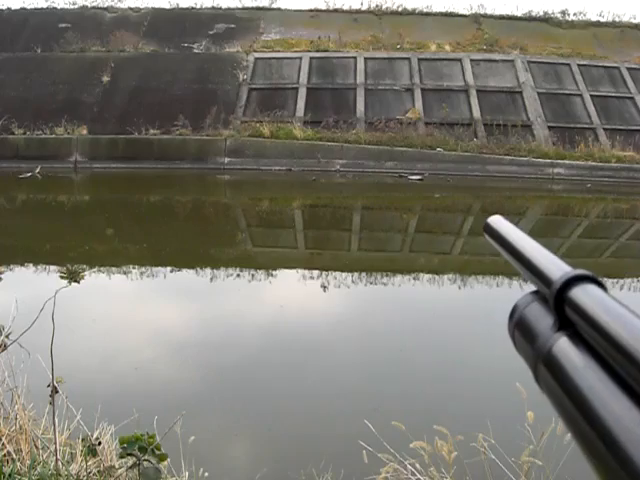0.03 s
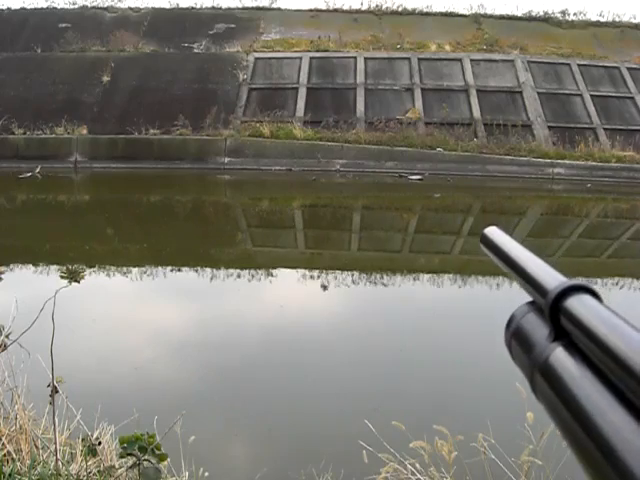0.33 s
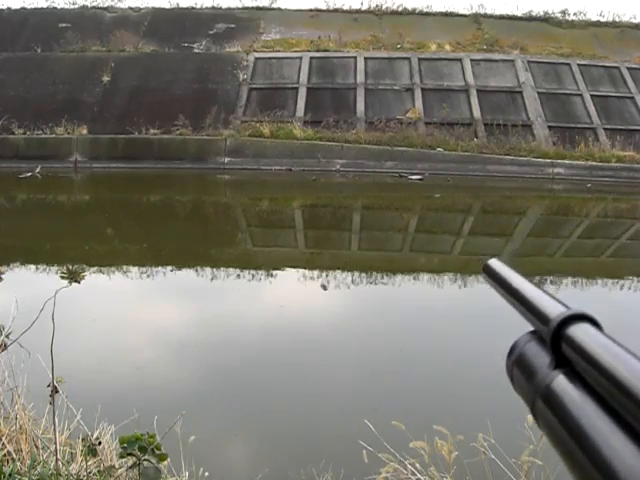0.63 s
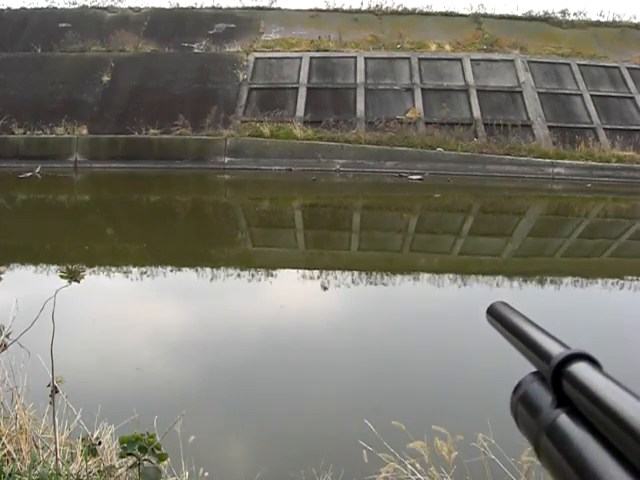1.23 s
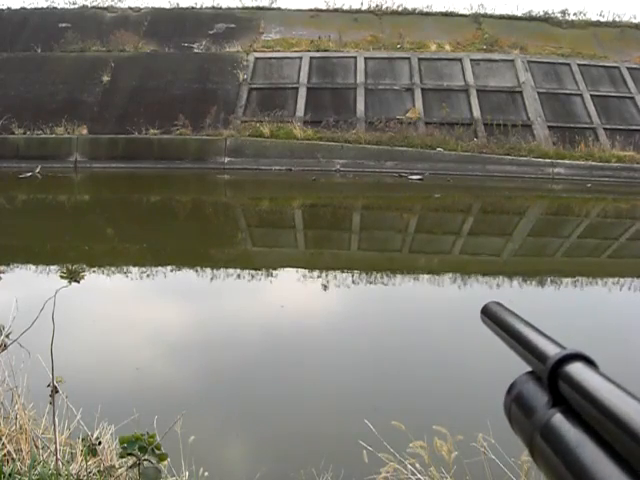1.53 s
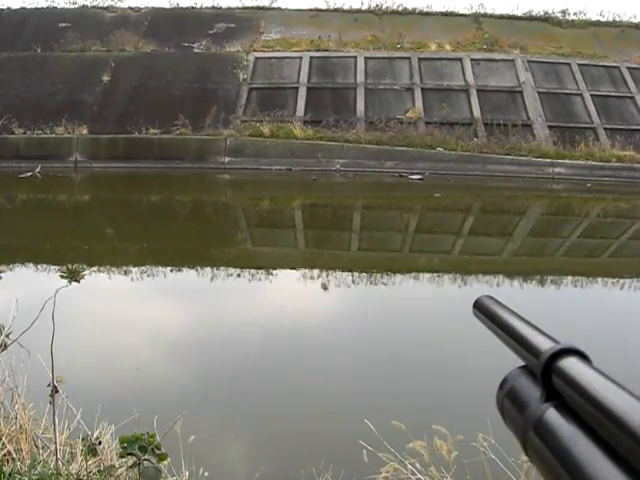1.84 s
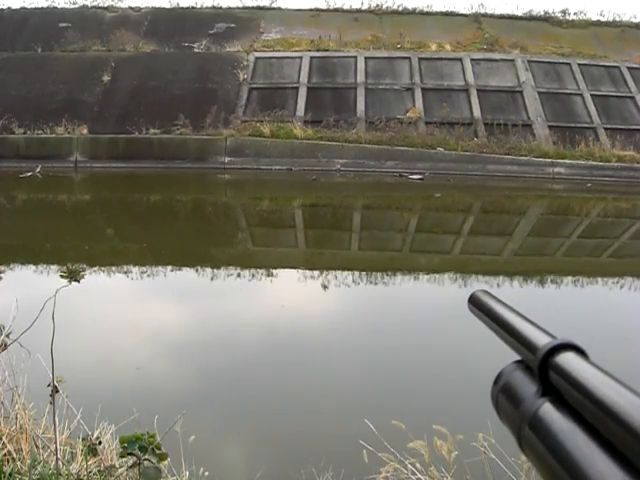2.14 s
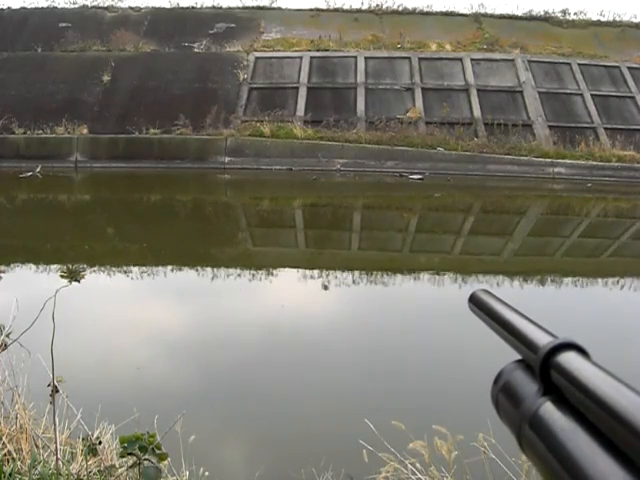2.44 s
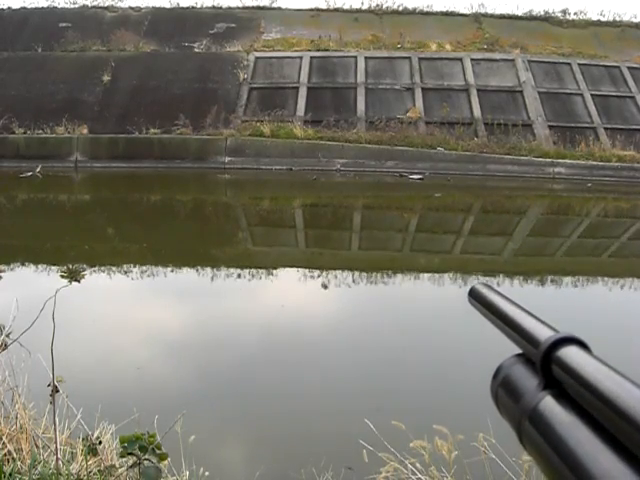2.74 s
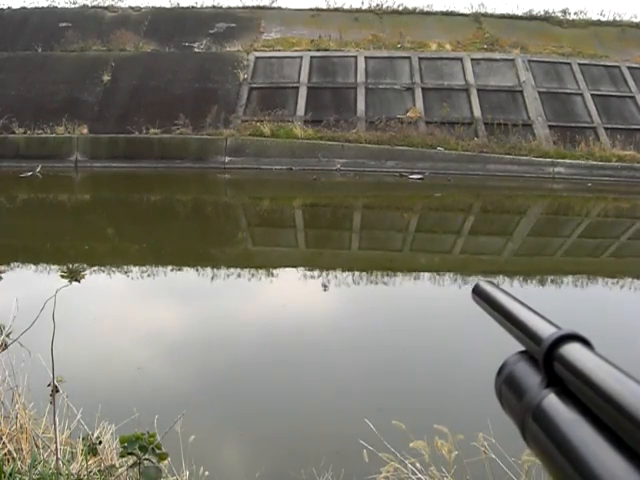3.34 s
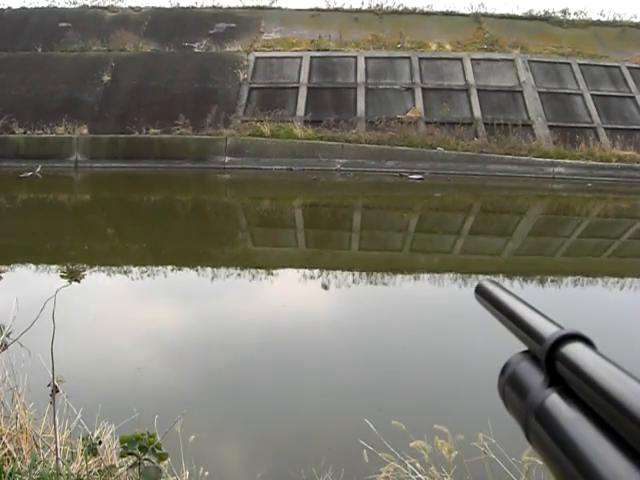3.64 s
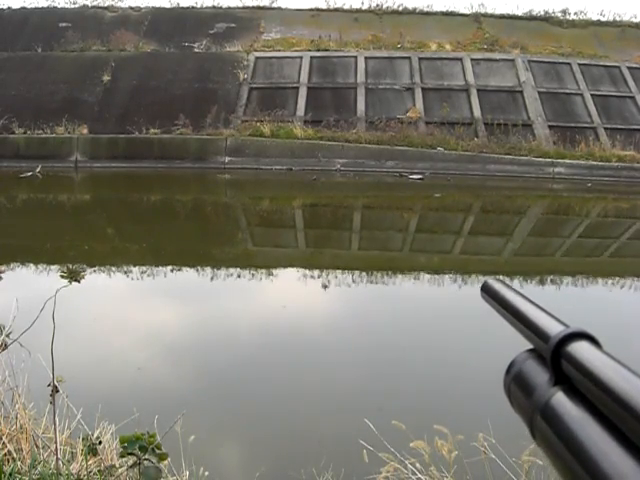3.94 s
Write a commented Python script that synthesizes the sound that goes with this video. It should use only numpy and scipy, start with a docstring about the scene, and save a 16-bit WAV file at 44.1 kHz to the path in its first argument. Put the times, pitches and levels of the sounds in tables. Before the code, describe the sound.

An air rifle is handled close to the microphone, rubbing, ticking and creaking, while a small bird gives four pairs of high chirps. A firmer knock and thin ticks follow, over outdoor hiss, wind rumble and a distant engine-like hum.

```python
"""Open-air hiss, wind rumble on the microphone and a hum like a distant engine's run throughout.
From 0.5 s a small bird beside a pond gives four pairs of high, arched chirps; far birds peep faintly.
Meanwhile, close by, a hand shifts on an air rifle: it rubs, ticks and is knocked softly,
and creaks ring its body, thickest from 2 to 2.7 s. After the last chirps comes the firmest knock,
at 3.2 s; the hum swells, and a run of thin ticks ends the scene."""
import sys
import numpy as np
from scipy import signal
from scipy.fft import rfft, irfft
from scipy.io import wavfile
from scipy.ndimage import uniform_filter1d

SR = 44100
rng = np.random.default_rng(int(sys.argv[2]) if len(sys.argv) > 2 else 0)


def store_wav(level_fs):
    """Save 16-bit WAV to argv[1]."""
    pcm = np.round(np.clip(np.atleast_2d(level_fs), -1, 1) * 32767)
    wavfile.write(sys.argv[1], SR, pcm.T.astype(np.int16))


N = 176400
T = np.arange(N) / SR

# rifle body modes: f/Hz, level/dB, t60/s
BODY_MODES = [(318, -13.5, 0.11), (390, -29, 0.02), (501, -12, 0.087), (561, -18, 0.16), (622, -6, 0.045),
              (772, -10, 0.084), (1234, -22, .08), (1345, -16, 0.069), (1510, -24.5, 0.065),
              (2133, -12, 0.028), (2310, -28.5, 0.037), (2500, -48, 0.077), (2760, -33.5, 0.045)]


def amp(db):
    """Decibels to gain."""
    return 10 ** (np.asarray(db) / 20)


def unit(x):
    """Scale to rms 1."""
    return x / np.sqrt(np.mean(x ** 2) + 1e-20)


def spectrum_db(colour, hz):
    """Interpolate a spectrum over log frequency."""
    f, db = np.transpose(colour)
    return np.interp(np.log(hz + 1), np.log(f), db)


def add(mix, start_s, sound):
    """Mix a sound in at start_s."""
    part = mix[max(round(start_s * SR), 0):][:len(sound)]
    part += sound[:len(part)]


def drift(rate_hz):
    """Low-passed noise, rms 1."""
    lowpass = np.exp(-(np.fft.rfftfreq(N, 1 / SR) / rate_hz) ** 2)
    return unit(irfft(rfft(rng.standard_normal(N)) * lowpass, N))


def impulse(colour, tilt_db_oct=0, size=2048):
    """Minimum-phase pulse, energy 1, tilted above 500 Hz."""
    hz = abs(np.fft.fftfreq(size, 1 / SR))
    log_gain = np.log(amp(spectrum_db(colour, hz) + tilt_db_oct * np.log2(1 + hz / 500)))
    h = np.fft.ifft(np.exp(np.conj(signal.hilbert(log_gain)))).real[:size // 2]
    return h / np.linalg.norm(h)


def scatter(decay_s):
    """Spray of small reflections: decaying noise, energy 1."""
    t = T[:SR // 5]
    h = rng.standard_normal(len(t)) * np.exp(-t / decay_s)
    return h / np.linalg.norm(h)


def ring(modes, spread_db=2):
    """Decaying modes of alternating sign, reweighted at each blow."""
    t = T[:SR // 5]
    return sum((-1) ** k * amp(db + spread_db * rng.standard_normal() - 60 * t / t60_s)
               * np.sin(2 * np.pi * hz * t) for k, (hz, db, t60_s) in enumerate(modes))


def crack(colour, tilt_db_oct, rattle):
    """Sharp snap with a quick rattle and a faint tail."""
    spray = rattle * (scatter(decay_s=.0014) + amp(-10) * scatter(decay_s=.008))
    spray[0] += 1
    h = signal.fftconvolve(spray, impulse(colour, tilt_db_oct))
    return 2.78 * h / np.linalg.norm(h)


def air():
    """Open-air hiss with drifting spectral patches."""
    # hiss spectrum: f/Hz, relative density/dB
    colour = [(82, -33.5), (140, -2.5), (151, -9.5), (376, -8), (420, -10), (461, -10.5), (621, -16),
              (837, -15.5), (1330, -19), (2460, -23.5), (3510, -24.5), (3850, -25.5), (6490, -31),
              (9960, -34.5), (12000, -51), (15600, -80), (22000, -120)]
    # hiss envelope: t/s, level/dB
    levels = [(0, -49.5), (.3, -51.5), (.5, -49), (.8, -48.5), (1.25, -47.5), (1.55, -50), (2.1, -50),
              (2.6, -49), (3.0, -50.5), (3.35, -50.5), (3.6, -51), (4, -49)]
    patch_db, flicker_db = 1, .59
    frames, hz = N // 256 + 5, np.fft.rfftfreq(1024, 1 / SR)
    real, imag, patches = rng.standard_normal((3, frames, 513))
    patches = unit(uniform_filter1d(uniform_filter1d(patches, size=10, axis=0), size=12, axis=1))
    spectra = (real + 1j * imag) * amp(spectrum_db(colour, hz) + patch_db * patches)
    hiss = unit(signal.istft(spectra.T, nperseg=1024, noverlap=768)[1][:N])
    return hiss * amp(np.interp(T, *np.transpose(levels)) + flicker_db * drift(38))


def wind():
    """Lumpy low rumble on the microphone."""
    # rumble spectrum ahead of the low-pass: f/Hz, relative density/dB
    colour = [(10, -11), (25, -1), (45, 2.5), (60, 4), (85, -4.5), (120, -3), (170, -16.5), (300, -26),
              (800, -55)]
    # rumble envelope: t/s, level/dB
    levels = [(0, -42.5), (.5, -47), (1.2, -45), (1.6, -45.5), (2.0, -43.5), (2.5, -44.5), (2.85, -42),
              (3.1, -44), (3.4, -45.5), (3.7, -46), (4, -45)]
    cutoff_hz, flicker_db = 900, .79
    hz = np.fft.rfftfreq(N, 1 / SR)
    gain = amp(spectrum_db(colour, hz)) / (1 + (hz / cutoff_hz) ** 2)
    rumble = unit(irfft(rfft(rng.standard_normal(N)) * gain, N))
    return rumble * amp(np.interp(T, *np.transpose(levels)) + flicker_db * drift(24))


def buffets(hz=60, length_s=.029):
    """Short, dull pushes of air on the microphone."""
    # pushes: t/s, level/dB
    pushes = [(.62, -31), (2.818, -34), (2.867, -34)]
    out, t = np.zeros(N), np.arange(0, length_s, 1 / SR)
    for start_s, db in pushes:
        add(out, start_s, amp(db) * np.hanning(len(t)) * np.sin(2 * np.pi * (hz * t + rng.random())))
    return out


def hum(ref_db=-42, waver=.14):
    """Low harmonics that waver and swell, like a distant engine."""
    # course of the hum: t/s, f/Hz, level/dB
    course = [(0, 58, -54), (.9, 61, -52), (1.3, 62, -45), (1.55, 60, -52), (1.75, 62, -45), (2.2, 60, -52),
              (2.75, 62.5, -47), (3.05, 63, -44), (3.25, 62, -35.5), (3.47, 62, -34), (3.75, 62.4, -39.5),
              (3.86, 62.5, -45), (4, 63, -42)]
    # harmonics: order, relative level/dB, share of the swell
    harmonics = [(1, -1, 1), (2, -12.5, .6), (4, -23, .6), (6, -26, .6)]
    times_s, hz, db = np.transpose(course)
    turns = np.cumsum(np.interp(T, times_s, hz)) / SR
    swell_db = np.interp(T, times_s, db) - ref_db
    out = np.zeros(N)
    for order, level_db, share in harmonics:
        rms = amp(ref_db + level_db + share * swell_db) * (1 + waver * np.sqrt(order) * drift(2.45))
        out += np.sqrt(2) * rms * np.sin(2 * np.pi * order * turns)
    return out


def far_peeps():
    """Far birds: faint, slightly falling whistles."""
    # peeps: t/s, length/s, f/Hz, fall/Hz, level/dB
    peeps = [(0.49, 0.048, 3950, 300, -53), (1.837, 0.028, 5940, 300, -52), (2.37, 0.02, 4700, 50, -61),
             (3.131, 0.038, 3630, 120, -56), (3.422, .034, 5880, 350, -51)]
    out, wobble = np.zeros(N), 1 + .02 * drift(700)
    for start_s, length_s, hz, fall_hz, db in peeps:
        u = np.arange(0, 1, 1 / (length_s * SR))
        turns = np.cumsum((hz - fall_hz * u) * wobble[:len(u)]) / SR
        add(out, start_s, amp(db) * np.sin(np.pi * u) * np.sin(2 * np.pi * turns))
    return out


def rubbing(slips_per_s=900, spread_db=4.5, ring_db=.5):
    """Hand on the rifle: quick swells of tiny slips, which also ring the body."""
    # rubs: t/s, length/s, level/dB, tilt/(dB/oct)
    rubs = [(0.456, 0.035, -54.5, 7.5), (0.654, 0.16, -53.5, -0.5), (0.738, .09, -55, 0.5),
            (0.785, 0.029, -54, -3), (0.917, 0.033, -42.5, .5), (1.057, 0.06, -42.5, -1.5),
            (1.145, 0.059, -48, -2.5), (1.768, .085, -50.5, -3), (1.859, 0.081, -51, -1),
            (1.972, 0.083, -47.5, -1.5), (2.093, 0.078, -48, -1), (2.478, 0.029, -45.5, -3),
            (3.351, 0.036, -57, 8.5)]
    # slip spectrum: f/Hz, level/dB
    colour = [(100, -20), (350, 6), (750, -4), (1000, 0.5), (1400, 5), (2000, -4.5), (2800, -6), (4400, -1),
              (6500, -13), (11000, -22)]
    out, body = np.zeros(N), ring(BODY_MODES)
    slips = (rng.random(N) < slips_per_s / SR) * rng.choice([-1, 1], N)
    slips = slips * amp(spread_db * np.minimum(rng.exponential(1, N), 3))
    for start_s, length_s, db, tilt in rubs:
        u = np.arange(0, 1, 1 / (length_s * SR))
        drive = amp(db) * unit(slips[round(start_s * SR):][:len(u)]) * np.sin(np.pi * u ** .51)
        add(out, start_s, signal.fftconvolve(drive, impulse(colour, tilt)))
        add(out, start_s, amp(ring_db) * signal.fftconvolve(drive, body / np.linalg.norm(body)))
    return out


def ticks():
    """Thin, high snaps of the rifle with little rattle."""
    # ticks: t/s, level/dB, tilt/(dB/oct)
    snaps = [(.199, -40, 11), (.466, -37, 11), (0.7371, -27, -10.5), (1.621, -41, 5), (1.8765, -64, 3),
             (2.487, -32, 0), (3.5408, -34.5, 7), (3.695, -40, 5), (3.7157, -39, 0), (3.7343, -35.5, 1),
             (3.7517, -40, 3), (3.771, -40, 0), (3.792, -37, -8), (3.8045, -41, 12), (3.817, -36, -5),
             (3.829, -44, -10), (3.847, -45, 0), (3.8832, -34.5, -2)]
    # tick spectrum: f/Hz, level/dB
    colour = [(500, -22), (3000, -8), (4000, 0), (4700, 4), (5500, -12), (6300, -1), (7200, -14),
              (11000, -24)]
    out = np.zeros(N)
    for start_s, db, tilt in snaps:
        add(out, start_s, amp(db) * crack(colour, tilt, rattle=.25))
    return out


def knocks(contact_s=.001, scuff_decay_s=.022):
    """Blows on the rifle: a ring dulled by soft contact, and a scuff."""
    # blows: t/s, ring/dB, scuff/dB
    blows = [(1.349, -34, -40), (1.759, -29.5, -42), (1.948, -48, -37), (2.512, -57, -49),
             (2.822, -59, -50), (3.2449, -19, -40)]
    # knock modes: f/Hz, level/dB, t60/s
    modes = [(178, -30, 0.25), (316, -12.5, 0.039), (360, -14, .1), (440, -6.5, 0.039), (630, -9.5, 0.045),
             (870, -14.5, 0.036), (1130, -16, 0.057)]
    # scuff spectrum: f/Hz, level/dB
    colour = [(80, -9), (175, 8), (260, 0), (400, 1), (700, -3.5), (1200, -19.5), (2500, -24),
              (8000, -42.5)]
    out, contact = np.zeros(N), np.sin(np.pi * np.arange(0, 1, 1 / (contact_s * SR)))
    for start_s, ring_db, scuff_db in blows:
        add(out, start_s, amp(ring_db) * np.convolve(ring(modes), contact / contact.sum()))
        scuff = signal.fftconvolve(scatter(scuff_decay_s), impulse(colour))
        add(out, start_s, amp(scuff_db) * scuff * np.sqrt(scuff_decay_s * SR) / np.linalg.norm(scuff))
    return out


def creaks():
    """Runs of cracks, each ringing the rifle's body."""
    # cracks: t/s, crack/dB, ring/dB, tilt/(dB/oct)
    cracks = [(.7362, -35, -63, -3), (.7431, -31, -67, -2), (0.805, -32, -42, -5.5),
              (0.9171, -25.5, -53, -3.5), (.9265, -31, -33.5, -7), (1.058, -27.5, -50, -4),
              (1.0685, -30, -52, -16), (1.0779, -36, -39, -6), (1.4965, -34.5, -55, 9),
              (1.547, -41, -39, -5), (1.9828, -24.5, -39, -8), (1.9885, -33, -30, -9),
              (1.9937, -32, -39, -3.5), (1.999, -40, -35, -3), (2.0062, -40, -37, -2),
              (2.0168, -30, -33, -2), (2.031, -23, -28.5, -2.5), (2.0658, -27.5, -42, -3),
              (2.113, -32.5, -44, -6), (2.1285, -38, -42, 6), (2.146, -28, -33, -7), (2.166, -24, -33, -4),
              (2.279, -41, -41, -3), (2.2953, -23.5, -28.5, -2.5), (2.3098, -21, -29.5, -3.5),
              (2.3222, -21.5, -26.5, -4.5), (2.4064, -24, -27, -0.5), (2.4095, -44, -57, 8),
              (2.491, -36, -38, 2), (2.5112, -26.5, -34.5, -0.5), (2.5627, -24, -34.5, 1.5),
              (2.5822, -29.5, -42, -4), (2.6015, -36.5, -39, 4), (2.621, -37.5, -37, 9),
              (2.6437, -28, -35.5, 0), (2.664, -27.5, -34.5, -3), (2.6859, -26, -41, -4.5),
              (2.763, -35, -41.5, -1)]
    # crack spectrum: f/Hz, level/dB
    colour = [(150, -5), (500, -3.5), (1000, -2.5), (1400, 0), (1950, -2), (2280, 0.5), (3300, -2),
              (4600, -8), (5500, -0.5), (6800, -12), (8100, -4.5), (8800, -14.5), (10000, -8),
              (12000, -29.5)]
    out = np.zeros(N)
    for start_s, crack_db, ring_db, tilt in cracks:
        add(out, start_s, amp(crack_db) * crack(colour, tilt, rattle=.95))
        add(out, start_s, amp(ring_db) * ring(BODY_MODES))
    return out


def chirp(rise_s, fall_s, top_hz, end_hz, db, second_hz, second_db):
    """A raspy whistle leaps to its crest and falls; a flatter second voice sounds above it."""
    # whistle envelope: share of length, level/dB
    swell = [(0, -18), (.12, -2.5), (.35, -6.5), (.55, -3), (.72, 3.5), (.86, -2.5), (1, 2)]
    # rasp spectrum: f/Hz, level/dB
    colour = [(1500, -43), (3500, 6), (6000, 4), (8500, -1), (11000, -6.5)]
    start_hz, second_sag_hz, rasp_db = 4800, 905, -15.5
    t = np.arange(0, rise_s + fall_s, 1 / SR)
    u = t / (rise_s + fall_s)
    rise_left = np.maximum(1 - t / rise_s, 0) ** 1.7
    fallen = (np.maximum(t - rise_s, 0) / fall_s) ** 1.5
    hz = top_hz - (top_hz - start_hz) * rise_left - (top_hz - end_hz) * fallen
    jitter, shimmer, hiss = rng.standard_normal((3, SR // 5))[:, :len(t)]
    wobble = 1 + .024 * unit(uniform_filter1d(jitter, size=24))
    flutter = 1 + .28 * unit(uniform_filter1d(shimmer, size=30))
    whistle = np.sin(2 * np.pi * np.cumsum(hz * wobble) / SR) * flutter
    rasp = amp(rasp_db) * unit(signal.fftconvolve(hiss, impulse(colour))[:len(t)])
    first = (whistle + rasp) * amp(np.interp(u, *np.transpose(swell)))
    second_turns = np.cumsum((second_hz - second_sag_hz * fallen) * wobble) / SR
    second = np.sin(2 * np.pi * second_turns) * np.sin(np.pi * u ** .3) ** 2
    return amp(db) * (first + amp(second_db) * second) * signal.windows.tukey(len(t), .1)


def near_bird():
    """Four pairs of chirps."""
    # chirps: t/s, rise/s, fall/s, top/Hz, end/Hz, level/dB, second voice/Hz, its relative level/dB
    chirps = [(.565, 0.012, 0.022, 6200, 5100, -39, 7520, -11),
              (0.65, 0.014, 0.019, 6530, 5200, -41.5, 7360, -4),
              (1.22, 0.014, 0.02, 7200, 4840, -46.5, 7500, -14),
              (1.294, 0.0089, 0.019, 7220, 5060, -42.5, 7600, -22),
              (2.031, .010, .020, 6920, 5280, -33, 7200, -24),
              (2.107, 0.012, 0.019, 7200, 4480, -35.5, 7400, -14),
              (2.8, .010, .022, 6920, 4960, -42.5, 7450, -14),
              (2.871, 0.0067, .019, 6950, 5160, -51, 7200, -23)]
    out = np.zeros(N)
    for start_s, *shape in chirps:
        add(out, start_s, chirp(*shape))
    return out


def pond(calls, echo_s=.0025, echo_db=-7, scatter_db=-15):
    """Calls plus their reflections off water and bank."""
    wet = amp(scatter_db) * signal.fftconvolve(calls, scatter(decay_s=.014))[:N]
    add(wet, echo_s, amp(echo_db) * calls)
    return calls + wet


def scene():
    """All sources at one microphone."""
    birds = pond(far_peeps() + near_bird())
    rifle = creaks() + knocks() + ticks() + rubbing()
    return (birds + rifle + air() + wind() + hum() + buffets())[None]


def record(dry):
    """Brief opening silence, then a steep low-pass."""
    silence_s, fade_s, cutoff_hz = .034, .003, 11750
    opened = dry * np.clip((T - silence_s) / fade_s, 0, 1)
    lowpass = signal.firwin(161, cutoff_hz, window=("kaiser", 8), fs=SR)
    return signal.oaconvolve(opened, lowpass[None], "same")


dry = scene()
out = record(dry)
store_wav(out)
```